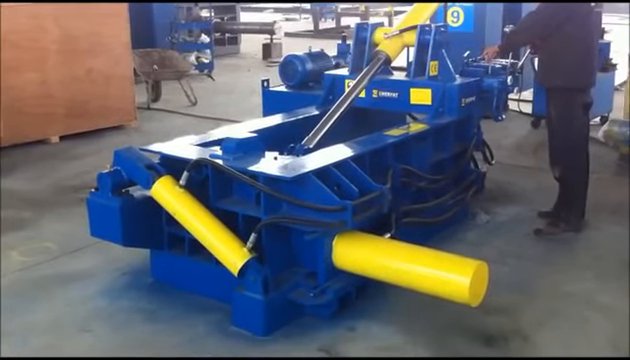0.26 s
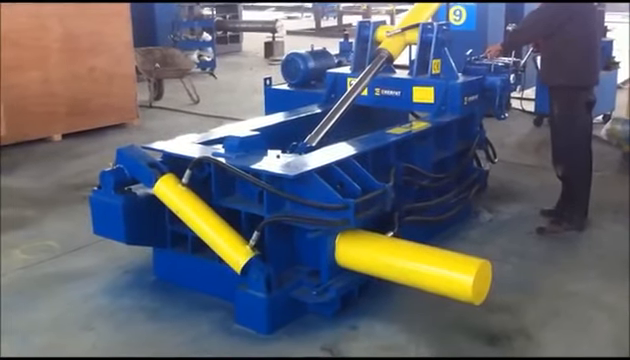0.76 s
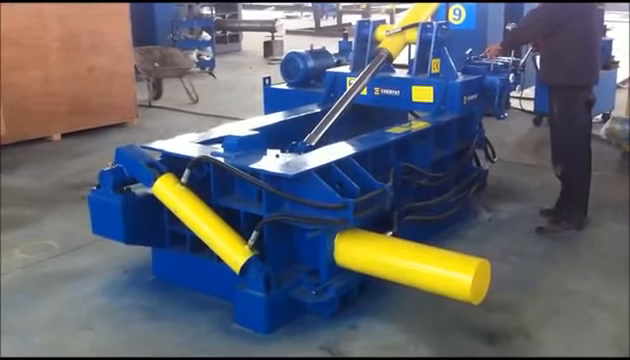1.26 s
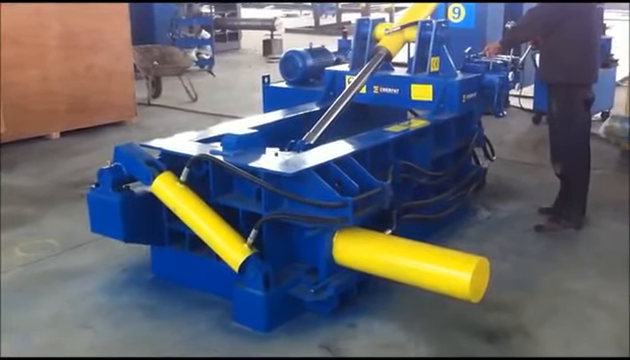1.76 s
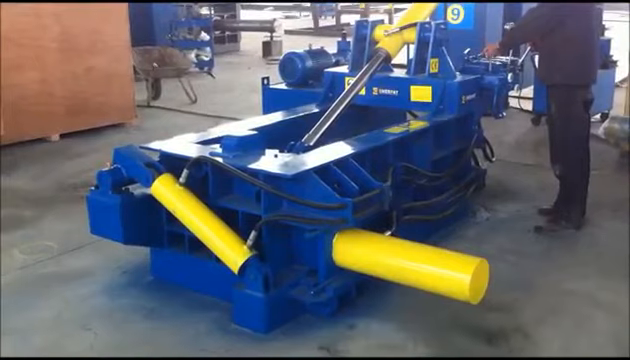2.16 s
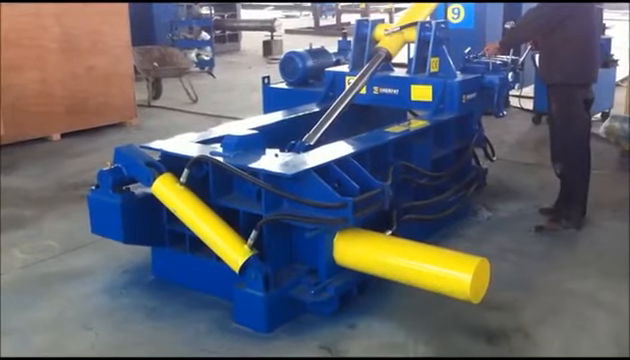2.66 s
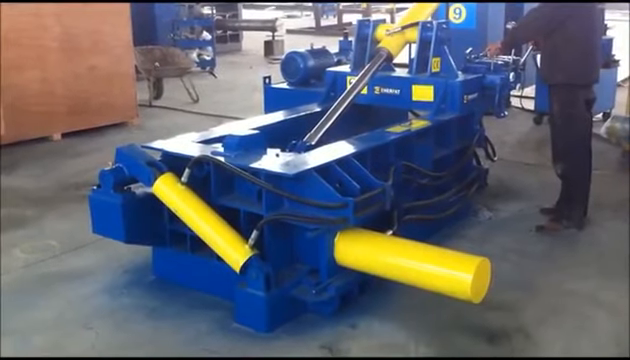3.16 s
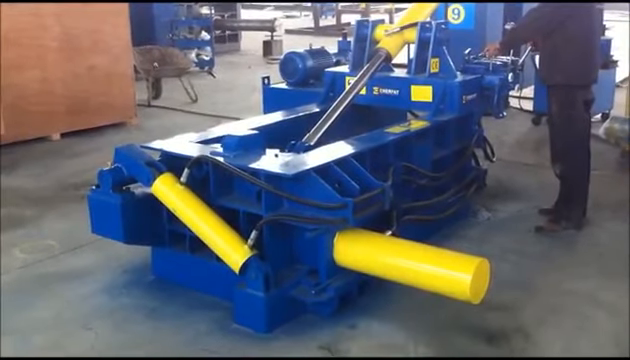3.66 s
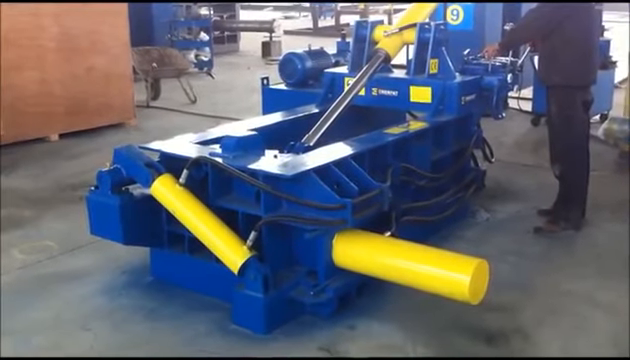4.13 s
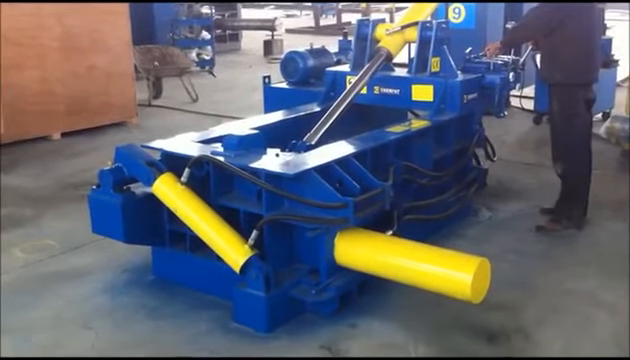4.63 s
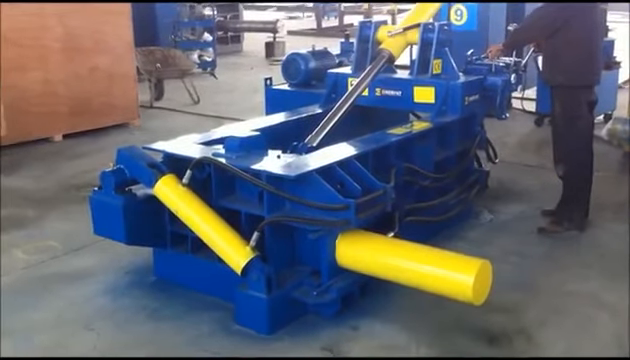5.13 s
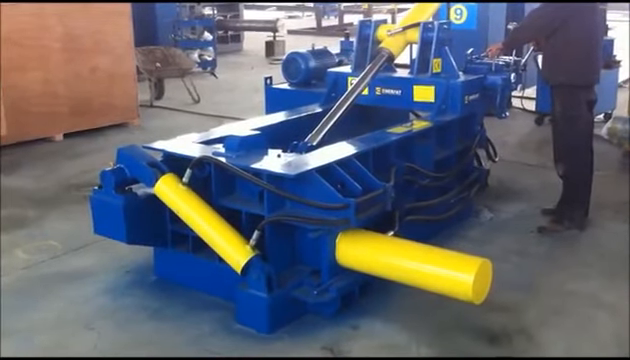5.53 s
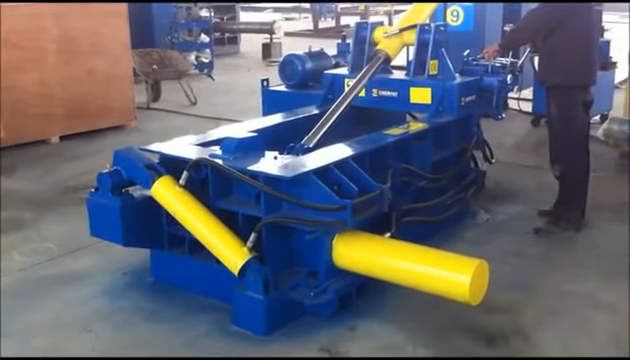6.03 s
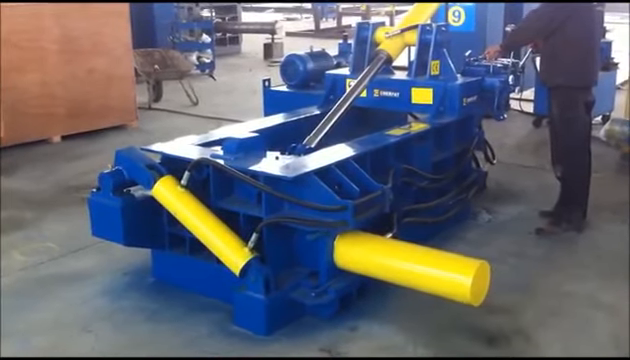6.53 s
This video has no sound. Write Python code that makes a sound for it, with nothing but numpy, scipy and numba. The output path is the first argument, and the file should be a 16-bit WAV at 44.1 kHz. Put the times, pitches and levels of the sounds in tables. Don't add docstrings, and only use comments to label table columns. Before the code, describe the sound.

A hydraulic baler runs without crushing anything in a factory hall. From 0 s a bright, dense hiss of oil through a valve fills the foreground, already under way, coloured by hollow, shifting resonances between roughly 2 and 12 kHz. It eases around 0.4 s, then recovers and flutters gently. Thin pipes sing softly within it near 1 s, 2.1-3 s and, as a pair of notes, just after 3 s. From about 4.2 s the hiss strengthens in uneven spurts, while faint notes slide downward; one rises around 5.5 s. Between 5.8 and 6.5 s clusters of metallic tones ring together, then a last falling whistle comes near 6.7 s. Beneath, a quiet pump hum near 350 Hz beats and wavers with faint motor whines. Distant machinery rumbles, with soft low thumps mostly after 5 s. One microphone, nearly mono, lightly echoing; the hiss continues to the end.

```python
import sys
import numpy as np
from scipy import signal
from scipy.fft import rfft, irfft
from scipy.io import wavfile
from scipy.ndimage import uniform_filter1d
from numba import njit

SR = 44100
rng = np.random.default_rng(int(sys.argv[2]) if len(sys.argv) > 2 else 0)


def file_out(sig):
    cols = np.atleast_2d(sig).T
    lim = np.clip(cols, -1, 1)
    pcm = np.round(lim * 32767).astype(np.int16)
    wavfile.write(sys.argv[1], SR, pcm)


def volts(x):
    e = np.asarray(x, float) / 20
    return 10 ** e


N = 299439
T = np.arange(N) / SR

# time_s, hiss_level_db
FLOW = [(0, -21.5), (.42, -25), (.65, -23), (.8, -24), (1.03, -22.5), (1.25, -24), (2.02, -21.4),
        (2.47, -22), (3.05, -20.5), (3.55, -22.5), (4.24, -19.5), (4.36, -19), (4.68, -18), (4.87, -19),
        (5.03, -17), (5.22, -19.5), (5.78, -20), (6.0, -18)]
FLOW_MEAN_DB = -21
ZONE_EDGES = (1700, 3300, 5200, 9500, 16000)
# level_db at mean flow, then db per db of flow, of spurt, of back pressure
ZONES = [(-29, 0.21, 0, 0.59), (-26.5, 0.45, 0.094, 0.053), (-21, 1, 0.13, 0), (-28, .7, 1.05, 0.039)]
# centre_s, length_s, change_db
SPURTS = [(0, .4, 0), (1.1, 0.92, 1.5), (1.9, 0.32, 1), (2.6, .5, 1), (3.0, .25, 2), (3.9, .3, 1.5),
          (4.22, 0.25, 3), (4.45, .12, -2.5), (4.63, .25, 2.5), (4.86, 0.15, -3), (5.0, 0.16, 1),
          (5.55, .4, -3.5), (5.78, .12, -1.5), (5.97, 0.31, 3), (6.37, 0.45, 2)]
# centre_s, length_s, change_db
PRESSURE = [(.2, 0.22, 2.5), (.9, 0.47, 1.5), (1.87, 0.54, 3.5), (2.2, .3, 2), (2.5, 0.24, 2.3),
            (2.78, .4, 2.3), (3.1, 0.53, 4.5), (3.8, .4, 4.5), (4.6, 0.46, 1.5), (5.0, .5, 1.5),
            (5.9, .35, 2), (6.25, .7, -1)]
# frequency_hz, density_db (per Hz)
JET = [(1500, -59), (1900, -27), (2200, -18.5), (3300, -6.5), (4000, -12.5), (5000, -4), (6000, -5),
       (7200, -3), (9200, -4), (10600, -5), (12000, -6.5), (14000, -9), (14300, -15.5), (15500, -12)]
# centre_hz, width_hz, peak_db (per Hz), follow_db (per dB of flow)
CAVITIES = [(2045, 86, -9, -0.9), (2242, 146, -1.5, -1.6), (2413, 79, -23, 4), (2720, 226, 0, -2),
            (3004, 227, -5.5, -2.5), (3628, 218, -4, -0.95), (4330, 272, 1.5, -0.1), (4556, 103, -11, -1.3),
            (5546, 110, -6, 0.1), (6417, 390, 0, 0.34), (6800, 267, -7, -0.5), (7785, 460, -7, 1),
            (8750, 507, -4.5, 1), (9930, 610, -3, 0), (11200, 480, -8, 0.2)]
# pitch_hz, level_db
PIPES = [(2005, -54.5), (2246, -43.5), (2363, -56), (2744, -47), (2915, -40.5), (2990, -43), (3698, -54),
         (4500, -52), (5013, -49), (5500, -42.5), (7433, -46)]
# start_s, end_s, pitch_hz, level_db, glide_hz
SINGING = [
    (.8, 1.3, 2740, -34, 0),
    (2.1, 2.6, 2750, -34, 0),
    (2.4, 3.0, 2915, -32.5, -1.5),
    (3.0, 3.3, 2663, -35, 1.5),
    (3.0, 3.3, 4420, -34, 1.5),
    (3.5, 4.1, 4330, -37.5, -23),
    (4.3, 5.1, 2280, -40, -43.5),
    (4.6, 5.6, 4170, -39, -20),
    (5.3, 5.95, 2427, -36.5, 47),
    (6.55, 6.9, 2970, -32, -42),
]
# (pitch_hz, level_db)
CHORDS = [
    (5.82, 6.4, [(808, -49), (908, -49), (2620, -29.5), (2765, -34), (4460, -45)]),
    (6.078, 6.543, [(2130, -42), (2368, -30), (2720, -29.5), (2900, -47), (3510, -38), (4380, -42), (5110, -36)]),
]
# start_s, end_s, pitch_hz, level_db, glide_hz
WHINES = [
    (0.055, 0.26, 515, -50, 3),
    (0.89, 1.02, 405, -44, 20),
    (1.15, 1.8, 450, -51, 42),
    (1.76, 4.7, 630, -50.5, -8),
    (4.9, 5.1, 1320, -44, -0.5),
    (3.75, 7.4, 575, -53, -59.5),
    (2.3, 3.2, 478, -53, 0),
]
# time_s, frequency_hz
PUMP_RATE = [
    (0, 349.2),
    (.95, 349.1),
    (1.7, 346.6),
    (2.1, 346.7),
    (2.45, 348),
    (6.79, 348),
]
# order, level_db
PUMP_ORDERS = [(1, -58), (3, -57.5), (4, -56), (5, -60.5)]
# centre_s, length_s, change_db
BEATS = [(.12, 0.78, -7), (.64, 0.46, 7), (.96, 0.22, -13), (1.12, .12, 3), (1.38, .35, 7), (1.62, .15, -9),
         (1.86, 0.25, -18), (2.22, 0.39, -12), (2.75, 0.54, -1.5), (3.2, 0.6, 5), (3.72, 0.73, 2.5),
         (4.12, .3, -3), (5.1, 0.45, -2.5), (5.7, 0.32, 5), (6.25, 0.72, -2), (6.56, 0.099, 1)]
# pitch_hz, level_db
MOTOR = [(92, -64.5), (205, -53.5), (256, -61.5), (385, -58), (633, -56.5), (740, -62.5), (821, -53),
         (922, -54.5), (1045, -56), (1319, -55)]
# frequency_hz, density_db (per Hz)
HALL = [(15, -66), (25, -29), (59, -33), (81, -22.5), (194, -9.5), (310, -7), (346, -8.5), (379, -6),
        (479, -12), (664, -12), (841, -8.5), (1190, -12), (1900, -10), (2470, -44), (4180, -120)]
# centre_s, length_s, change_db
THUMPS = [
    (2.3, .6, 3),
    (2.95, .3, 4),
    (3.65, .4, 5),
    (4.1, .4, -4),
    (5.15, 0.34, 7),
    (5.68, .15, 8),
    (6.08, 0.26, 9),
    (6.47, .2, 5),
]
# frequency_hz,
# share (0-1)
ECHO_SHARE = [(400, 0.15), (700, 0.05), (1500, 0.13), (3000, 0.18), (8000, 0.27), (11000, 0.13),
              (14000, 0.6), (15000, .85)]
# time_s, centre_hz
SIDE_PATCHES = [(.536, 10650), (.605, 5700), (1.116, 4950), (1.186, 7600), (1.418, 10300), (1.743, 11050),
                (1.859, 13800), (1.929, 9600), (3.786, 10300), (4.113, 8900), (4.344, 13450), (4.344, 5700),
                (4.367, 4900), (4.367, 8000), (4.76, 4850), (5.669, 4850), (5.669, 7600)]


def valve():
    flow_db = uniform_filter1d(np.interp(T, *np.transpose(FLOW)) - FLOW_MEAN_DB, size=2600)
    effort_db = uniform_filter1d(flow_db, size=16000)
    hiss = coloured(JET) * volts(0.15 * walk(6))
    for hz, width, db, follow in CAVITIES:
        hiss = hiss + volts(db + follow * effort_db) * cavity(hz, width)
    hiss = echoes(hiss)

    flutter_db = 0.2 * walk(5) + 0.3 * walk(40)
    controls = np.array([flow_db, swells(SPURTS), swells(PRESSURE)])
    out = 0
    for lo, hi, (db, *shares) in zip(ZONE_EDGES, ZONE_EDGES[1:], ZONES):
        zone = band(hiss, lo, hi)
        even = zone / np.sqrt(uniform_filter1d(zone ** 2, size=9000))
        zone_db = db - 0.63 + np.array(shares) @ controls + flutter_db + 0.28 * walk(8)
        out = out + even * volts(zone_db)
    return out


def cavity(hz, width):
    broad = svf(ring(hz, width * 1.5, .004), np.full(N, 1. * hz), width * 2.5)
    out = volts(.8 * walk(1.2) + .9 * walk(9)) * broad
    overtone_width = 0.0035 * hz * max(hz / 4500, 1)
    for off in np.linspace(-1, 1, num=7) + rng.uniform(-0.11, .12, size=7):
        overtone_db = 3.5 - hz / 2500 - 8.8 * off ** 2 + 3.2 * walk(2.6)
        out = out + volts(overtone_db) * ring(hz + 0.78 * off * width, overtone_width, 0.0016)
    return out


def pipes():
    out = 0
    for hz, db in PIPES:
        out = out + level(ring(hz, 9.0, .0006), db) * volts(2.5 * walk(1.6))
    chords = [(start, end, hz, db, -.01 * hz) for start, end, notes in CHORDS for hz, db in notes]
    for note in SINGING + chords + WHINES:
        out = out + singing_note(*note)
    return out


def singing_note(start, end, hz, db, glide):
    way = np.clip((T - start) / (end - start), 0, 1)
    pitch = hz * (1 + .0018 * walk(7)) + glide * (way - .5)
    locked = volts(4 * walk(10) - 3) * np.sin(2 * np.pi * np.cumsum(pitch) / SR)
    loose = level(svf(rng.standard_normal(N), pitch, 1 + .009 * hz), -1)
    return np.sin(np.pi * way) ** 0.22 * level(locked + loose, db)


def pump():
    turn = np.pi * np.cumsum(np.interp(T, *np.transpose(PUMP_RATE))) / SR
    hum_db = -45 + swells(BEATS) + 0.7 * walk(8)
    out = np.sqrt(2) * volts(hum_db) * np.sin(2 * turn + 0.42 * walk(5.5))
    for order, db in PUMP_ORDERS:
        out = out + np.sqrt(2) * volts(db + 3.5 * walk(2.7)) * np.sin(order * turn + 0.69 * walk(2.2))
    for hz, db in MOTOR:
        out = out + level(ring(hz, 5.0, 0.0018), db) * volts(walk(1.2))
    return out


def hall():
    noise = level(coloured(HALL), -36.5 - 1.88)
    out = cut(noise, 15, 60) + cut(noise, 60, 160) * volts(swells(THUMPS))
    for lo in 160 * 1.5 ** np.arange(7):
        out = out + cut(noise, lo, lo * 1.5) * volts(.8 * walk(1.2) + .5 * walk(5))
    return out


def echoes(x):
    hz, _, cells = signal.stft(x, SR, nperseg=2048, noverlap=1536)
    paths = rng.standard_normal((2,) + cells.shape)
    for _ in range(2):
        paths = uniform_filter1d(paths, size=2, axis=1)
        paths = uniform_filter1d(paths, size=11, axis=2)
    share = np.clip(np.interp(hz, *np.transpose(ECHO_SHARE)), 0, 1)[:, None]
    echo = (paths[0] + 1j * paths[1]) / np.sqrt(2 * paths.var())
    cells = cells * np.abs(np.sqrt(1 - share) + np.sqrt(share) * echo)
    return signal.istft(cells, SR, nperseg=2048, noverlap=1536)[1][:N]


def ring(hz, width, drift):
    return svf(rng.standard_normal(N), hz * (1 + drift * walk(1.5)), 1. * width)


@njit
def svf(x, hz, width):
    y, b, l = np.empty(len(x)), 0., 0.
    for i in range(len(x)):
        g, k = np.pi * hz[i] / SR, width / hz[i]
        g = g + g ** 3 / 3 + 2 * g ** 5 / 15
        v = (b + g * (x[i] - l)) / (1 + g * (g + k))
        b, l, y[i] = 2 * v - b, l + 2 * g * v, k * v
    return y


def coloured(points):
    hz, db = np.transpose(points)
    bins = np.maximum(np.arange(N // 2 + 1) * SR / N, 1)
    gain = volts(np.interp(np.log(bins), np.log(hz), db, -80, -80))
    return irfft(rfft(rng.standard_normal(N)) * gain, N)


def walk(rate):
    knots = uniform_filter1d(rng.standard_normal(int(N / SR * rate * 4) + 8), size=4)
    return np.interp(T, np.linspace(0, N / SR, len(knots)), knots / knots.std())


def swells(rows):
    out = 0
    for centre, length, db in rows:
        out = out + db * np.cos(np.pi * np.clip((T - centre) / length, -.5, .5)) ** 1.1
    return out


def level(x, db):
    return x * volts(db) / np.sqrt(np.mean(x ** 2))


def band(x, lo, hi):
    return signal.sosfiltfilt(signal.butter(3, [lo, hi], "band", fs=SR, output="sos"), x)


def cut(x, lo, hi):
    hz = np.arange(N // 2 + 1) * SR / N
    return irfft(rfft(x) * ((hz > lo) & (hz < hi)), N)


def scene():
    return np.tile(valve() + pipes() + pump() + echoes(hall()), (2, 1))


def top_cut(x):
    return signal.sosfilt(signal.butter(12, 15010, fs=SR, output="sos"), x)


def record(dry):
    mid = cut(dry[0], 15, 15005)
    other = np.roll(mid, shift=3000)
    side = 0
    for s, hz in SIDE_PATCHES:
        fade = np.clip(2 - np.abs(T - s) / .008, 0, 1)
        side = side + fade * cut(other, hz - 800, hz + 800)
    return top_cut(mid + volts(-3.5) * side * np.array([[1], [-1]]))


dry = scene()
out = record(dry)
file_out(out)
```